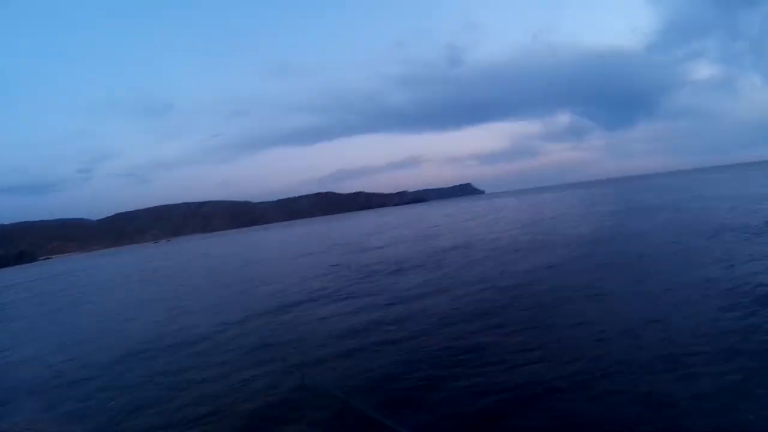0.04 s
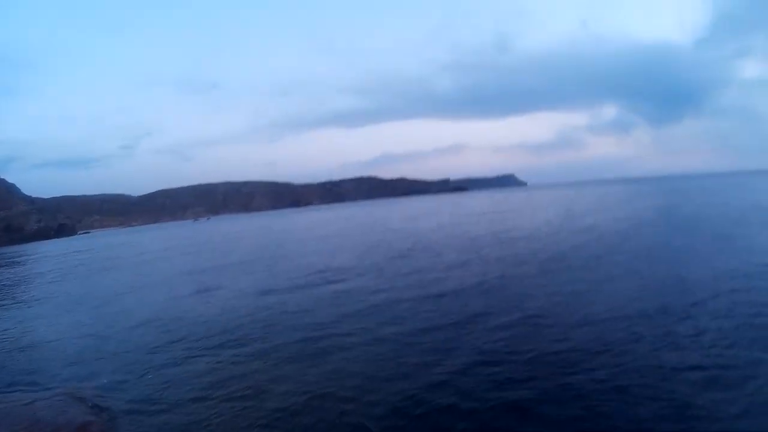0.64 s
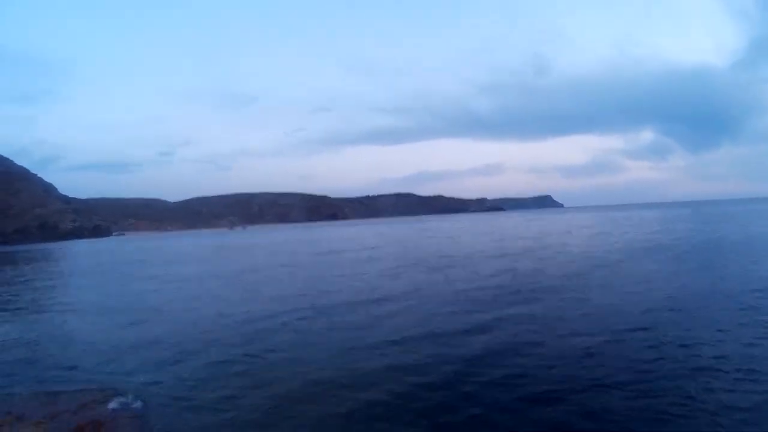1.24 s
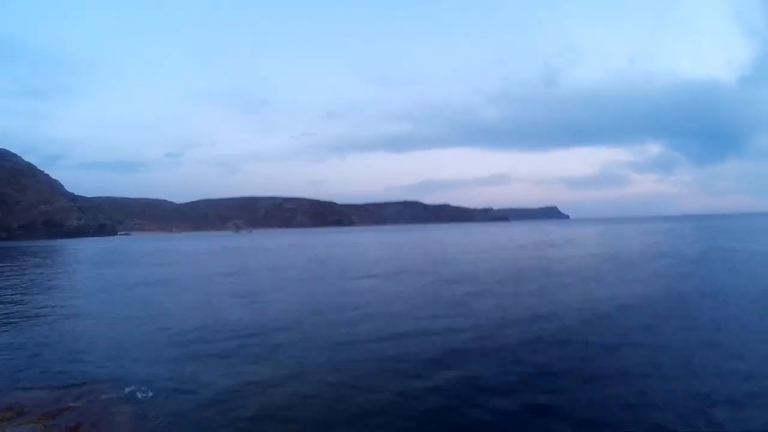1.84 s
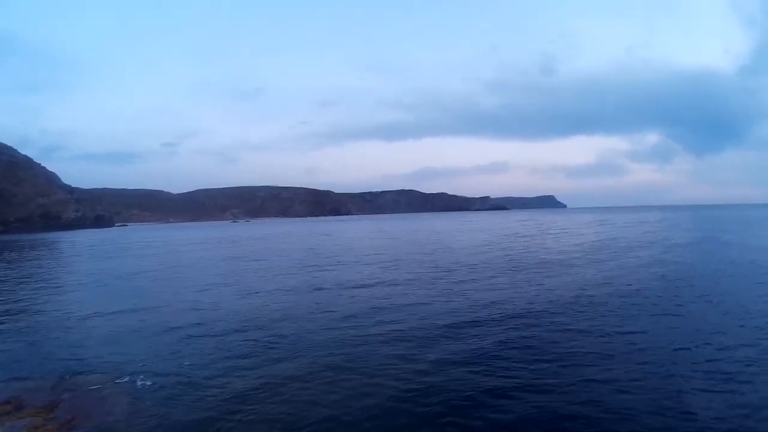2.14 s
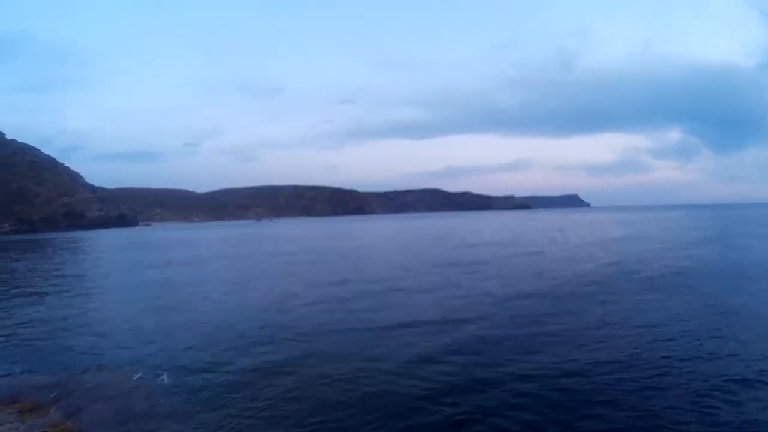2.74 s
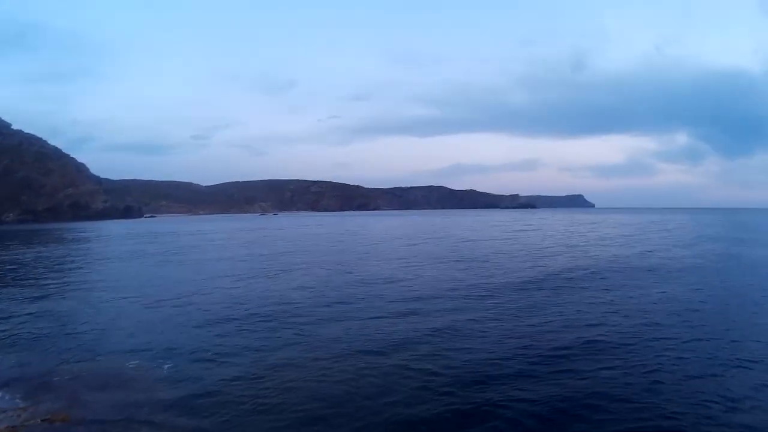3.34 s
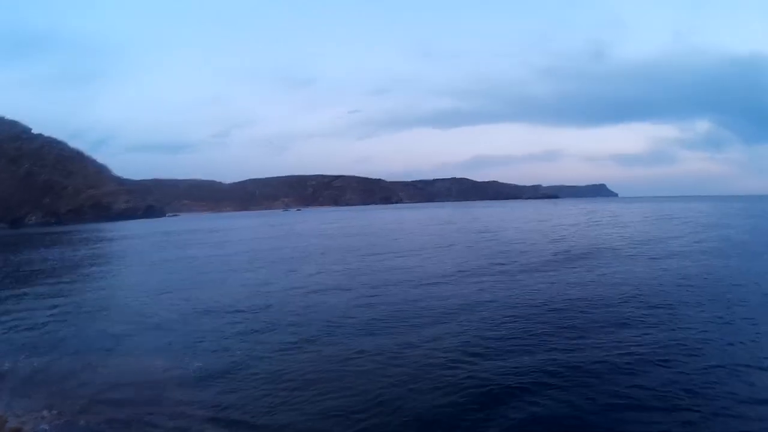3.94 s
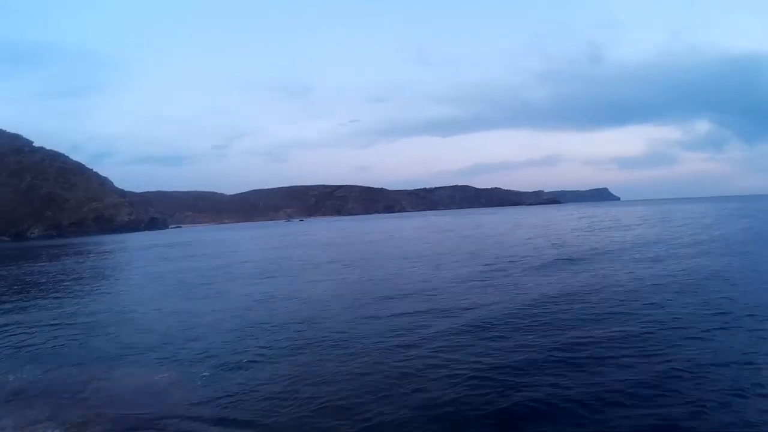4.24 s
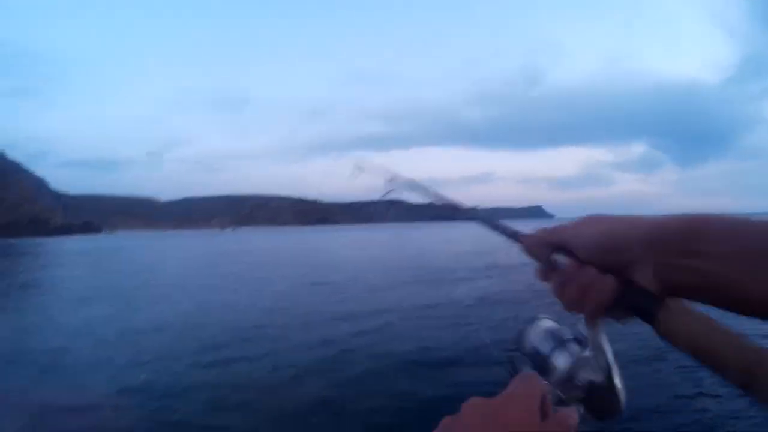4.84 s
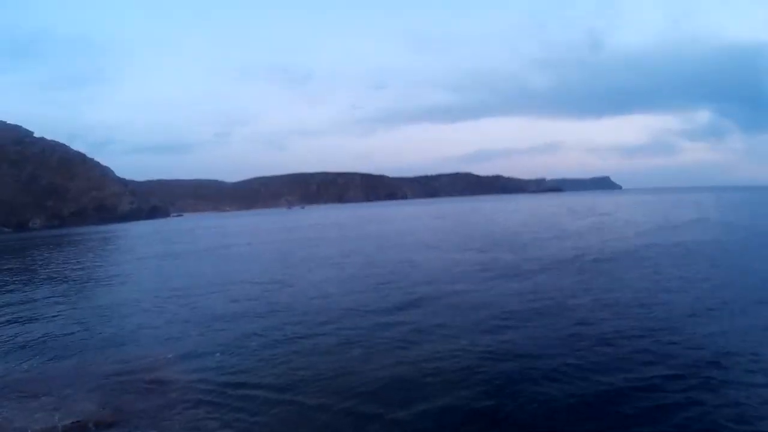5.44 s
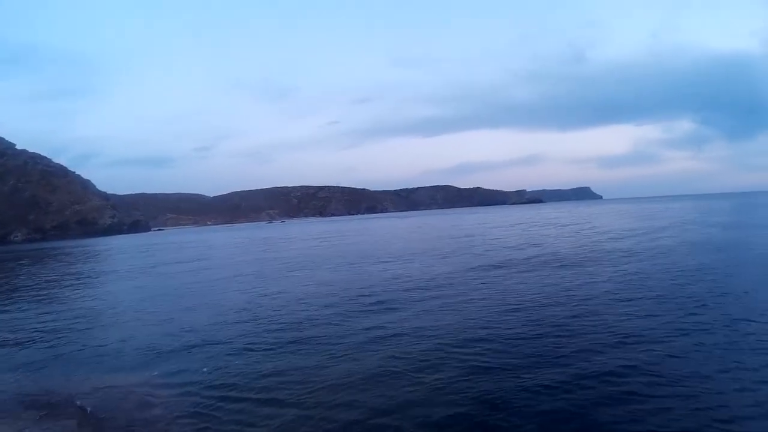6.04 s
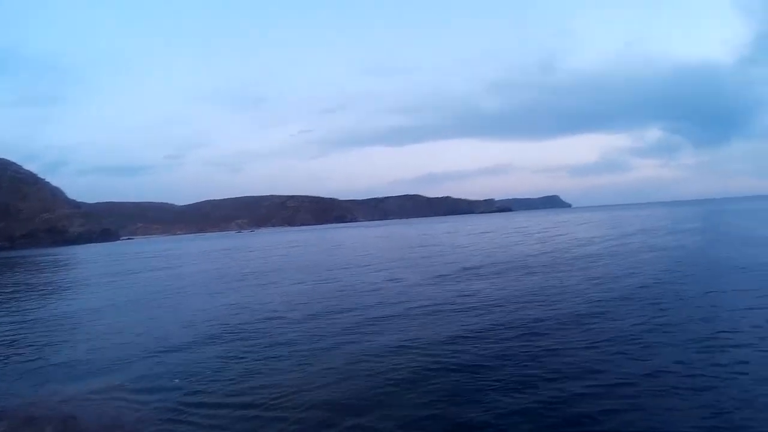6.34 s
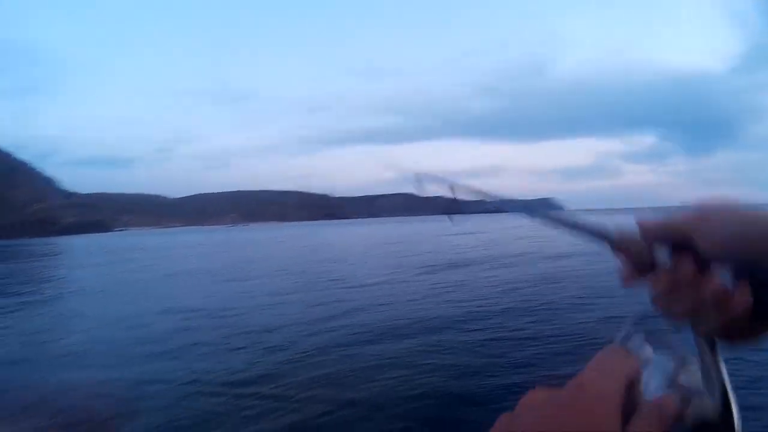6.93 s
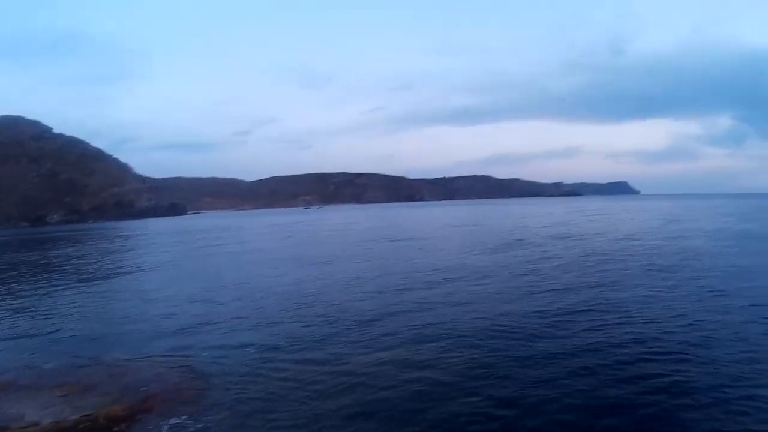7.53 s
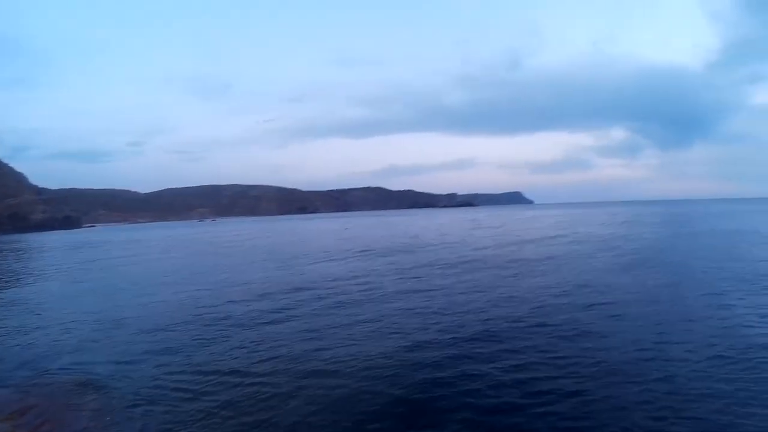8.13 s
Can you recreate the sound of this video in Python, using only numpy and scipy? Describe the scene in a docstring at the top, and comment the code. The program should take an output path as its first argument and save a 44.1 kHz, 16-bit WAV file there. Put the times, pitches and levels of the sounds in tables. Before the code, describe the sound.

Heard outdoors from a microphone sealed in a waterproof case, gentle waves lap and gurgle between rocks, sounding somewhat muffled. One hard click rings the case near the start, and small drips, ticks and short splashes dot the sloshing. The water drops to a lull after the middle, then laps again more softly. A faint hiss and high wavering whine run underneath.

```python
"""Calm sea laps on shore rocks, heard from a camera in a closed waterproof case. From the start, swells slosh
and heave over the camera's hiss and thin whine. Trapped air resonates in laps, glugs and drips, and light ticks
join in. Near one second something hard taps the case and its shell rings. Brief splashes fall from about three
seconds on. A little past halfway everything turns quieter, and then softer swells return."""
import sys
import numpy as np
from scipy import signal
from scipy.fft import rfft, irfft, next_fast_len
from scipy.io import wavfile
from scipy.ndimage import uniform_filter1d, map_coordinates

SR = 44100
rng = np.random.default_rng(int(sys.argv[2]) if len(sys.argv) > 2 else 0)


def inscribe(sig):
    """Save sig as 16-bit PCM at rate SR to the path in sys.argv[1].

    A 1-D sig is mono; a 2-D sig holds one channel per row.
    Samples are clipped to [-1, 1] before scaling.
    """
    pcm = np.round(np.clip(np.atleast_2d(sig).T, -1, 1) * 32767)
    wavfile.write(sys.argv[1], SR, pcm.astype(np.int16))


N = 360738


def amp(db):
    """Amplitude ratio of a level in decibels."""
    return 10 ** (np.asarray(db) / 20)


def unit(x):
    """Normalisation to an rms of 1."""
    return x / np.sqrt(np.mean(x ** 2) + 1e-20)


def curves(rows):
    """Linear interpolation: one value per sample for each column after the time."""
    times, *columns = np.transpose(rows)
    return [np.interp(np.arange(N) / SR, times, column) for column in columns]


def wobble(rate_hz):
    """Random modulation: a spline through rate_hz Gaussian values a second."""
    knots = rng.standard_normal(int(N * rate_hz / SR) + 4)
    return map_coordinates(knots, [np.arange(N) * rate_hz / SR])


def add(track, start, sound):
    """Superposition of a sound on the track, from start in seconds."""
    part = track[round(start * SR):][:len(sound)]
    part += sound[:len(part)]


def coloured(x, points):
    """Minimum-phase filtering with a gain that follows the (Hz, dB) points."""
    size = 2 * next_fast_len(N // 2 + 8192)
    hz, db = np.transpose(points)
    gain = amp(np.interp(np.log(np.fft.rfftfreq(size, 1 / SR) + 1), np.log(hz), db))
    cepstrum = irfft(np.log(np.maximum(gain, 1e-6)))
    cepstrum[1:size // 2] *= 2  # folding the cepstrum makes the filter causal
    cepstrum[size // 2 + 1:] = 0
    return irfft(rfft(x, size) * np.exp(rfft(cepstrum)))[:N]


def churn(patchy_db):
    """Modulated noise of rms 1: its gain varies in small patches of time and frequency."""
    spectrum = signal.stft(rng.standard_normal(N), nperseg=512)[2]
    patches = uniform_filter1d(rng.standard_normal(spectrum.shape), size=4, axis=0)
    patches = uniform_filter1d(patches, size=3, axis=1)
    return unit(signal.istft(spectrum * amp(patchy_db * unit(patches)), nperseg=512)[1][:N])


def bubble(t, hz, cycles, rise):
    """Damped resonance of an air pocket, whose pitch climbs as it nears the surface."""
    age = t * hz / cycles
    phase = hz * t * (1 + rise * age / (age + 2))
    return np.sin(2 * np.pi * phase) * np.exp(-age) * (1 - np.exp(-2 * t * hz))


def bubble_cloud(count, low_hz, high_hz, cycles, spread_db, samples):
    """Incoherent sum of bubbles of random time, pitch, damping and strength, at rms 1."""
    when, pitch, life, strength = rng.random((count, 4)).T[:, :, None]
    hz = low_hz * (high_hz / low_hz) ** pitch
    rings = bubble(np.arange(samples) / SR, hz, cycles * (.5 + life), rise=0.11)
    gain = amp(-spread_db * np.log(strength + 0.011))  # a few are much stronger than the rest
    index = (when * N).astype(int) + np.arange(samples)
    return unit(np.bincount(index.ravel(), (gain * rings).ravel(), N)[:N])


# Slosh, spray and foam as heard through the case. Each row: frequency in Hz, gain in dB.
SLOSH_SPECTRUM = [(88, -54.5), (150, -17), (296, -12.5), (487, -2), (732, 2.5), (1220, -12.5), (1330, -32),
                  (1440, -18), (1700, -24), (2210, -39), (3740, -120)]
SPRAY_SPECTRUM = [(650, -15.5), (1100, -15.5), (1250, -6.5), (1340, -4.5), (1460, -7.5), (1890, -5.5),
                  (2080, -1), (2640, -9.5), (2910, -7), (3590, -20), (4260, -15), (4790, -19.5),
                  (5240, -16.5), (6030, -28.5), (6500, -28), (8450, -56), (14300, -120)]
FOAM_SPECTRUM = [(5000, -38), (6500, -6.5), (8200, -3), (10000, -7), (11800, -8), (15000, -25)]
# The slow swell. Each row: time in seconds, relative slosh level in dB, relative spray level in dB.
SWELL = [(0, -34, -49.5), (.3, -32, -44), (.75, -32.5, -44.5), (1.05, -30.5, -45), (1.6, -33, -48.5),
         (1.98, -31, -45.5), (2.7, -35.5, -51.5), (2.95, -33.5, -44), (3.3, -30, -46.5), (3.8, -32, -47.5),
         (4.4, -38.5, -52), (4.66, -47, -59), (5.15, -47, -61), (5.45, -47, -62.5), (5.95, -38.5, -54.5),
         (6.17, -46.5, -58.5), (6.6, -41, -56), (8.18, -41.5, -59)]


def wash():
    """Resonance rises as bubbles shrink: in each swell big ones gurgle, small ones crackle, foam fizzes."""
    gurgle = bubble_cloud(3400, low_hz=255.8, high_hz=1406, cycles=2.97, spread_db=1.0, samples=1500)
    slosh_noise = unit(coloured(churn(patchy_db=2.0), SLOSH_SPECTRUM))
    slosh = unit(unit(coloured(gurgle, SLOSH_SPECTRUM)) + amp(-1.5) * slosh_noise)
    crackle = bubble_cloud(11000, low_hz=1113, high_hz=6100, cycles=3.5, spread_db=4.5, samples=500)
    spray_noise = unit(coloured(churn(patchy_db=1.94), SPRAY_SPECTRUM))
    spray = unit(unit(coloured(crackle, SPRAY_SPECTRUM)) + amp(-0.5) * spray_noise)
    fizz = bubble_cloud(12000, low_hz=6140, high_hz=13000, cycles=3, spread_db=2.5, samples=120)
    foam = unit(coloured(fizz, FOAM_SPECTRUM))
    slosh_db, spray_db = curves(SWELL)
    surge = surges()  # adds to the swell in power
    ripple = wobble(40)  # ripples shake slosh and spray together
    slosh_gain = np.hypot(amp(slosh_db + 0.5), surge) * draw_back() * amp(0.5 * ripple)
    spray_gain = np.hypot(amp(spray_db - 0.5), amp(-22) * surge) * amp(.7 * ripple)
    return slosh * slosh_gain + (spray + amp(-21.5) * foam) * spray_gain


# The rumble of the hollows. Each row: frequency in Hz, gain in dB.
HOLLOW_SPECTRUM = [(20, -2), (70, -4.5), (130, -4), (200, 1), (300, -2), (500, -11.5), (1500, -100)]
# The heaving of the water. Each row: time in seconds, relative level in dB.
HEAVE_LEVELS = [(0.0, -59.5), (0.52, -51.5), (1.34, -53), (2.09, -49), (2.25, -52.5), (3.37, -49.5),
                (4.76, -60.5), (5.1, -57), (6.24, -57), (6.45, -53.5), (7.08, -55), (8.18, -50)]


def hollows():
    """Water heaves between the rocks: low noise and the resonance of large air pockets."""
    heave_db = curves(HEAVE_LEVELS)[0] + 2 * wobble(13)
    pockets = bubble_cloud(260, low_hz=97.4, high_hz=301, cycles=2.6, spread_db=1, samples=6000)
    gulps = unit(coloured(pockets, HOLLOW_SPECTRUM))
    rumble = unit(coloured(churn(patchy_db=1.0), HOLLOW_SPECTRUM))
    return amp(heave_db + 1.5) * unit(amp(-4) * gulps + rumble)


# The camera's hiss. Each row: frequency in Hz, gain in dB.
HISS_SPECTRUM = [(20, 6), (1000, 11.5), (6300, -1.5), (8200, 1.5), (10300, -1.5), (11800, 1.5), (13000, -2),
                 (15700, -3)]
# The tones of its whine. Each row: frequency in Hz, relative level in dB.
WHINE_TONES = [(9415, -80), (9491, -77), (9523, -81), (9561, -67), (9636, -94)]
# The gain of hiss and whine together. Each row: time in seconds, gain in dB.
ELECTRONICS_GAIN = [(0, 1.5), (4.54, 2), (4.65, -5.5), (5.7, -5.5), (5.95, -2), (6.2, -5.5), (6.9, -2),
                    (7.5, -4), (8.18, -2)]


def electronics():
    """A thin whine of close tones near 9.5 kHz sounds over a broadband hiss."""
    t = np.arange(N) / SR
    whine = np.zeros(N)
    for hz, db in WHINE_TONES:
        phase = 2 * np.pi * (hz * t + rng.random()) + 0.28 * wobble(7.2)
        whine += amp(db) * np.sqrt(2) * np.sin(phase)
    hiss = amp(-61.0) * unit(coloured(rng.standard_normal(N), HISS_SPECTRUM))
    return (whine + hiss) * amp(curves(ELECTRONICS_GAIN)[0])


# Wavelets on top of the swell. Each row: start in seconds, relative level in dB, seconds until draining.
WAVELETS = [(0.175, -30.5, 0.23), (.41, -31.5, 0.24), (1.844, -31, 0.08), (3.03, -42, .1),
            (3.174, -30, .12), (3.827, -36.5, 0.11), (4.1, -34, .04), (4.386, -42.5, 0.21),
            (4.866, -44, 0.11), (5.751, -40, 0.062), (5.88, -39, 0.19), (6.218, -42, 0.2),
            (6.488, -41.5, 0.2), (6.733, -38, .06), (6.811, -36, .05), (6.989, -35.5, 0.04),
            (7.07, -36, .06), (7.163, -43.5, 0.13), (7.39, -39, 0.056), (7.514, -37, 0.027),
            (7.723, -35, 0.051), (7.824, -35.5, 0.1), (8.076, -32.5, 0.14)]


def surges(rise_s=0.017, drain_s=0.015):
    """Amplitude envelope of the wavelets: each runs up linearly, holds and drains exponentially."""
    t = np.arange(N) / SR
    envelope = np.zeros(N)
    for start, db, hold in WAVELETS:
        run_up = np.clip((t - start) / rise_s, 0, 1)
        drain = np.exp(-np.maximum(t - start - hold, 0) / drain_s)
        envelope += amp(db) * run_up * drain
    return envelope


# Transmission of the laps through the case. Each row: frequency in Hz, gain in dB.
CASE_TRANSMISSION = [(60, -37), (300, -1), (1000, 3), (3000, 2), (6000, -25), (15000, -47)]
# Wavelets that trap air. Each row: start in seconds, relative level in dB, starting pitch in Hz.
LAP_POCKETS = [(0.175, -21, 760), (0.273, -20, 664), (0.283, -13, 748), (0.374, -17.5, 680),
               (0.439, -13.5, 684), (0.483, -16.5, 793), (0.597, -16, 638), (0.984, -19, 600),
               (1.073, -16.5, 776), (1.152, -26, 654), (1.409, -20.5, 666), (1.542, -19, 655),
               (1.639, -23, 700), (2.106, -20, 670), (3.031, -11.5, 499), (3.06, -16.5, 505),
               (3.128, -16.5, 644), (3.215, -16.5, 692), (3.229, -16, 700), (3.297, -15, 810),
               (3.374, -17.5, 740), (3.403, -11.5, 734), (3.638, -17, 611), (3.874, -18.5, 750),
               (3.913, -16, 544), (4.118, -23, 715), (5.328, -30.5, 409), (5.91, -22, 795),
               (5.946, -20.5, 684), (6.07, -23.5, 636), (6.222, -28.5, 740), (6.634, -21, 603),
               (6.824, -22, 464), (6.845, -20, 503), (6.867, -20, 514), (6.96, -24.5, 635),
               (7.0, -15.5, 583), (7.097, -24, 785), (7.127, -28, 738), (7.404, -23.5, 365),
               (7.733, -23, 650), (8.084, -25, 720), (8.154, -22, 612)]


def laps():
    """Impulse excitation: a wavelet slaps the rock and trapped air rings; the case dulls the slap."""
    out, t = np.zeros(N), np.arange(SR // 8) / SR
    froth = unit(coloured(rng.standard_normal(N), SLOSH_SPECTRUM))
    slap_envelope = amp(-60 * t / 0.1) * (1 - np.exp(-t / 0.0033))
    for start, db, hz in LAP_POCKETS:
        slap = froth[rng.integers(N - len(t)):][:len(t)] * slap_envelope
        add(out, start, amp(db - 1.0) * (bubble(t, hz, cycles=3.4, rise=0.035) + 0.19 * slap))
    return coloured(out, CASE_TRANSMISSION)


def draw_back(depth_db=2, lead_s=0.0063, width_s=0.0057):
    """Amplitude modulation: the slosh sinks for a moment as the water gathers for each lap."""
    t = np.arange(N) / SR
    dips = sum(np.exp(-np.minimum(((t - start + lead_s) / width_s) ** 2, 20))
               for start, _, _ in LAP_POCKETS)
    return amp(-depth_db * dips)


# The largest air pockets. Each row: start in seconds, relative level in dB, starting pitch in Hz.
GLUG_POCKETS = [(0.275, -20, 250), (0.756, -22.5, 282), (1.03, -37, 252), (1.182, -29.5, 128),
                (2.411, -28, 236), (3.023, -29, 237), (3.151, -33.5, 112), (3.495, -30, 277),
                (3.641, -27, 196), (3.858, -30, 234), (6.509, -34, 275), (6.61, -33, 196),
                (7.66, -31.5, 185), (8.017, -32, 140)]


def glugs():
    """Mass-spring resonance: a large air pocket is a soft spring for the water, so it rings low."""
    out, t = np.zeros(N), np.arange(SR // 5) / SR
    for start, db, hz in GLUG_POCKETS:
        add(out, start, amp(db - 2.5) * bubble(t, hz, cycles=2.6, rise=0.069))
    return out


# The clearest drops. Each row: start in seconds, relative level in dB, starting pitch in Hz.
DROPS = [(.321, -24, 1500), (1.394, -28, 1430), (2.805, -32, 2100), (2.906, -28, 1900), (2.933, -30, 1440),
         (3.006, -31, 2050), (3.265, -27, 1600), (3.305, -27, 2850), (3.48, -29, 2290), (3.673, -29, 2880),
         (4.424, -37, 2430), (4.62, -41, 2060), (4.792, -46, 2020), (4.982, -37, 2230), (5.165, -39, 2060),
         (5.18, -40, 1930), (5.196, -43, 1560), (5.68, -39, 2070), (6.538, -36, 1790), (6.769, -33, 1770),
         (6.83, -32.5, 1490), (7.038, -37, 1600), (7.201, -33, 1950)]


def drips():
    """Air entrainment: a drop hits the surface with a small spatter, and its bubble plinks."""
    out, t = np.zeros(N), np.arange(SR // 16) / SR
    mist = unit(coloured(rng.standard_normal(N), SPRAY_SPECTRUM))
    for start, db, hz in DROPS:
        spatter = 0.25 * amp(-60 * t / 0.036) * mist[round(start * SR):][:len(t)]
        add(out, start, amp(db - 4.0) * (bubble(t, hz, cycles=7.0, rise=0.011) + spatter))
    return out


# The colour the case gives the ticks. Each row: frequency in Hz, gain in dB.
TICK_COLOUR = [(1500, -27), (3500, -6), (4200, 1.5), (5400, 7), (6200, -5), (8300, 5), (12000, -10),
               (15700, -26)]
# Light, crisp ticks. Each row: start in seconds, relative level in dB, starting pitch in Hz.
CRISP_TICKS = [(.665, -42.5, 5200), (0.789, -38, 4230), (1.052, -41, 5270), (1.371, -45, 4270),
               (2.098, -42, 3770), (2.215, -41.5, 4330), (2.447, -47, 4930), (2.557, -42, 4370),
               (2.824, -46, 4640), (2.916, -39, 4380), (3.843, -35.5, 4070)]


def ticks():
    """Rapid damping: a high ring with a trace of fizz dies so soon that it is heard as a tick."""
    out, t = np.zeros(N), np.arange(SR // 32) / SR
    for start, db, hz in CRISP_TICKS:
        fizz = 0.4 * amp(-60 * t / 0.013) * rng.standard_normal(len(t))
        add(out, start, amp(db + 2.0) * (bubble(t, hz, cycles=5.3, rise=0.024) + fizz))
    return coloured(out, TICK_COLOUR)


# The modes of the case. Each row: frequency in Hz, relative level in dB, seconds to decay by 60 dB.
CASE_MODES = [(616, -14, .012), (930, 8, 0.0094), (1188, 4.5, 0.033), (1360, -12, .015),
              (2131, -6.5, 0.063), (3020, -19.5, 0.028), (4260, -19, 0.04), (4560, -27, .03),
              (5300, -22, .02), (8200, -28, .02), (9370, -33.5, .03), (12000, -32, .025)]
# The crack of a contact. Each row: frequency in Hz, gain in dB.
CRACK_SPECTRUM = [(200, -19), (650, 14.5), (1700, 9), (2200, 8), (3400, -18), (4500, 4), (6200, -17),
                  (8500, -13.5), (12500, -33), (15700, -20)]
# The contacts within the one tap. Each row: start in seconds, relative strength in dB.
CONTACTS = [(.844, -20.5), (.8592, -26), (.8604, 0), (.866, -21), (.8724, -15.5)]


def case_tap():
    """Modal vibration: something hard chatters on the case; each touch cracks and rings the shell."""
    out, t = np.zeros(N), np.arange(SR // 8) / SR
    ring = sum(amp(db - 60 * t / t60) * np.sin(2 * np.pi * hz * t) for hz, db, t60 in CASE_MODES)
    grit = unit(coloured(rng.standard_normal(N), CRACK_SPECTRUM))
    attack = 1 - np.exp(-t / .00025)
    for start, db in CONTACTS:
        crack = amp(-5.5 - 60 * t / 0.038) * grit[round(start * SR):][:len(t)]
        add(out, start, amp(db - 9.0) * (ring + crack) * attack)
    bass_cut = signal.butter(3, 330, "highpass", fs=SR, output="sos")  # the small shell gives no bass
    return signal.sosfilt(bass_cut, out)


# The droplets of a splash. Each row: frequency in Hz, gain in dB.
DROPLET_SPECTRUM = [(400, 4), (900, 5), (1400, -3), (2100, 4), (3100, -14), (3800, -20), (5200, -28),
                    (8000, -76)]
# Thrown water landing. Each row: time of the peak in seconds, level in dB, Gaussian width in seconds.
LANDINGS = [(3.304, -47, 0.013), (5.8, -48.5, .012), (6.773, -48, .015), (7.23, -49.5, 0.027),
            (7.77, -48.5, 0.012), (7.923, -36, 0.015), (8.131, -39.5, 0.0065)]


def splashes():
    """Overlapping impacts: the droplets of thrown water merge into a short swell of noise."""
    t = np.arange(N) / SR
    envelope = sum(amp(db) * np.exp(-.5 * ((t - peak) / width) ** 2) for peak, db, width in LANDINGS)
    return envelope * unit(coloured(churn(patchy_db=2), DROPLET_SPECTRUM))


def scene():
    """Superposition of the water, the tap on the case and the camera's own noise in one channel."""
    water = wash() + hollows() + laps() + glugs() + drips() + ticks() + splashes()
    return (water + case_tap() + electronics())[None]


def record(dry, ceiling=.75, top_hz=15750):
    """Saturation and band limiting: the microphone rounds peaks; the camera keeps only the band below top_hz."""
    rounded = dry / (1 + (dry / ceiling) ** 4) ** .25
    size = next_fast_len(N + 8192)
    passband = np.fft.rfftfreq(size, 1 / SR) < top_hz
    return irfft(rfft(rounded, size) * passband, size)[:, :N]


dry = scene()
out = record(dry)
inscribe(out)
```